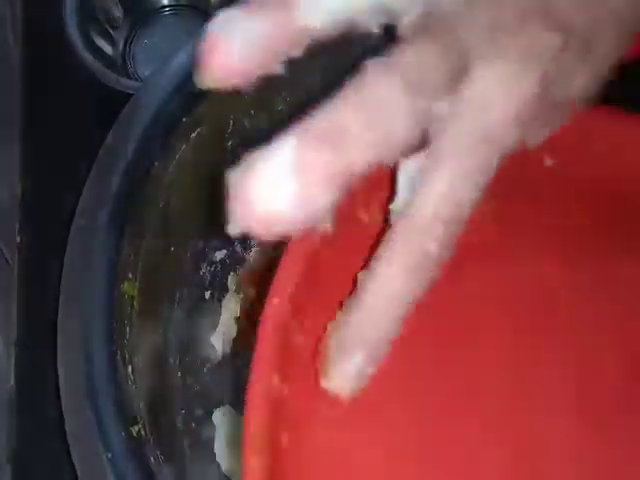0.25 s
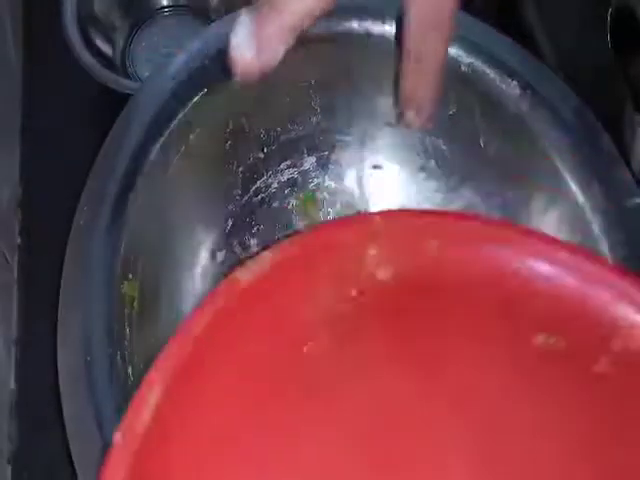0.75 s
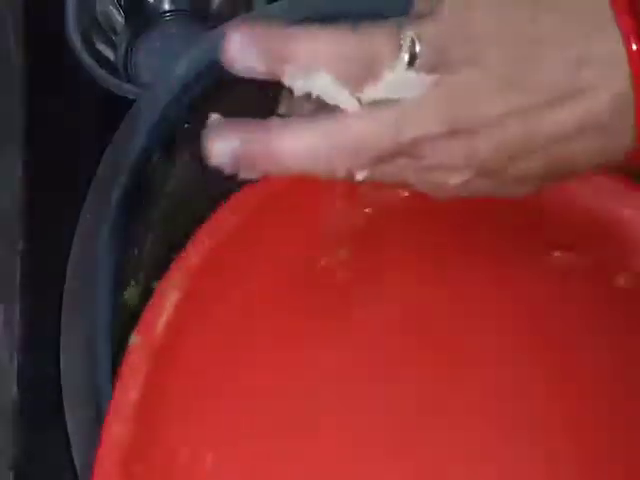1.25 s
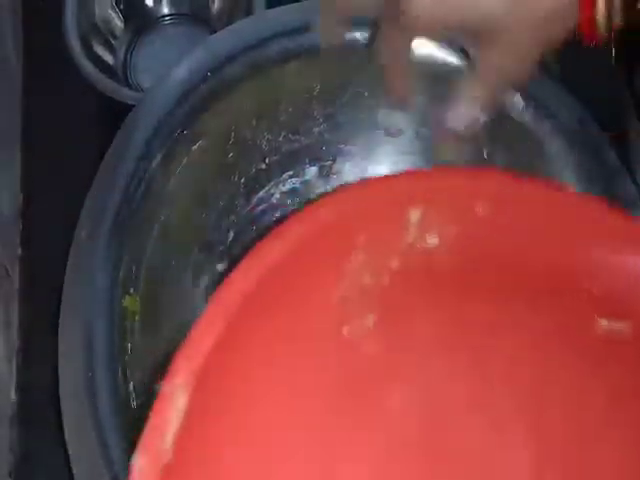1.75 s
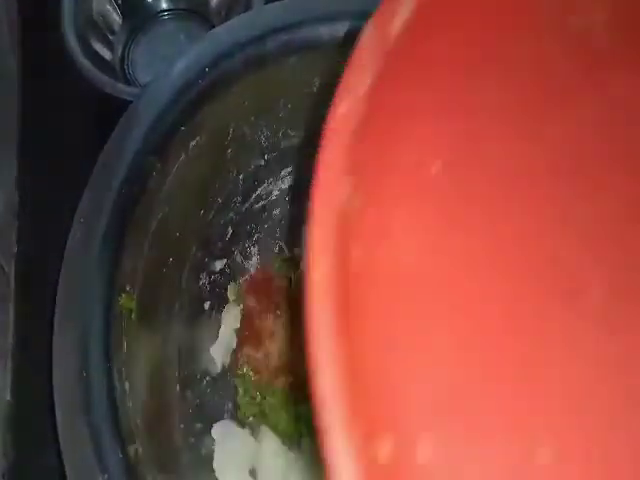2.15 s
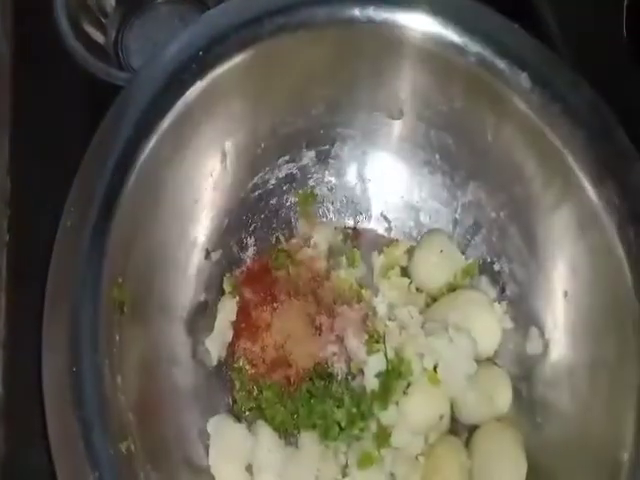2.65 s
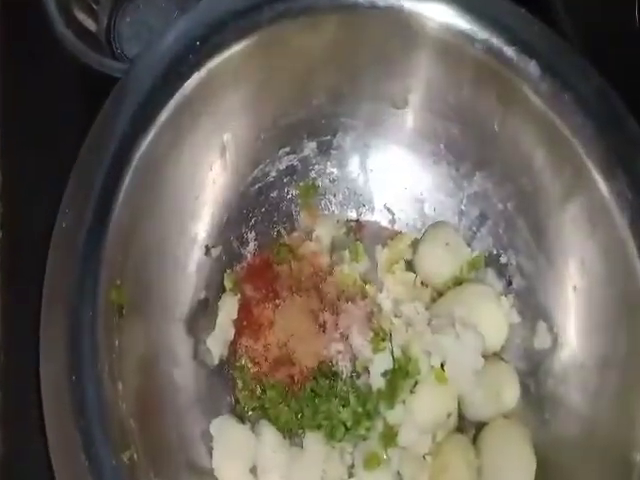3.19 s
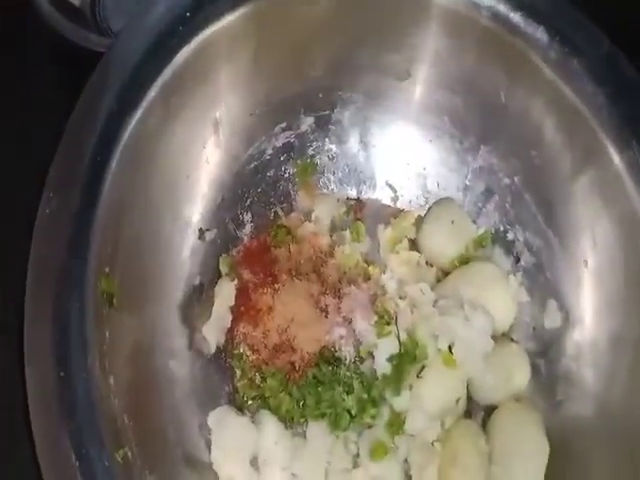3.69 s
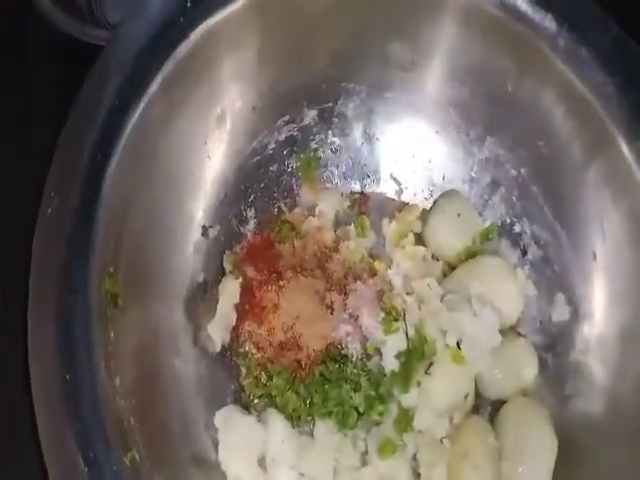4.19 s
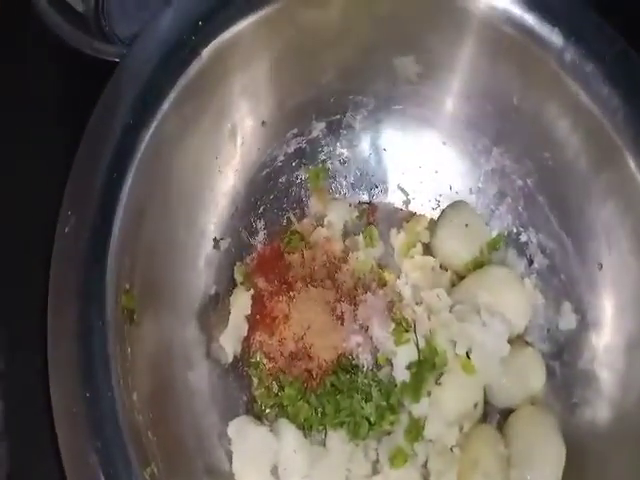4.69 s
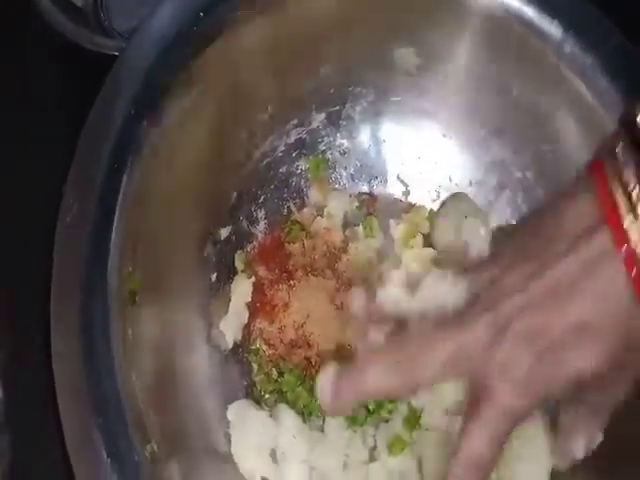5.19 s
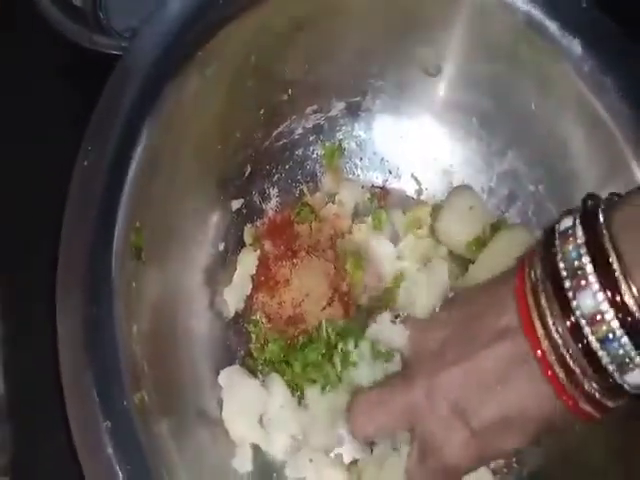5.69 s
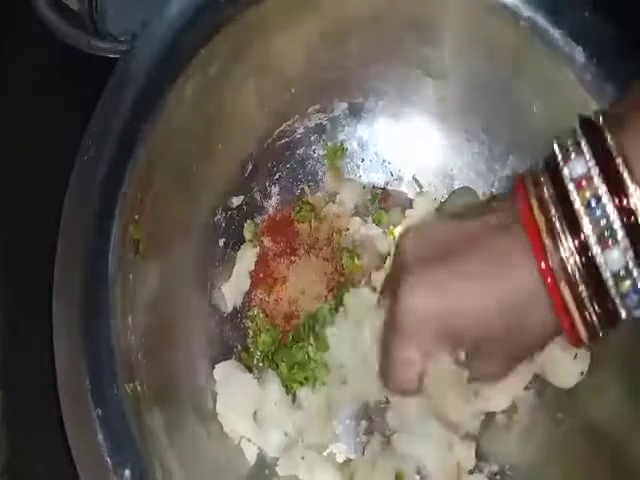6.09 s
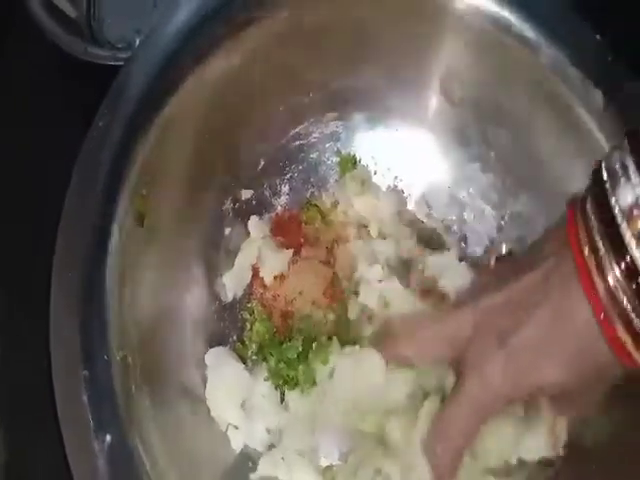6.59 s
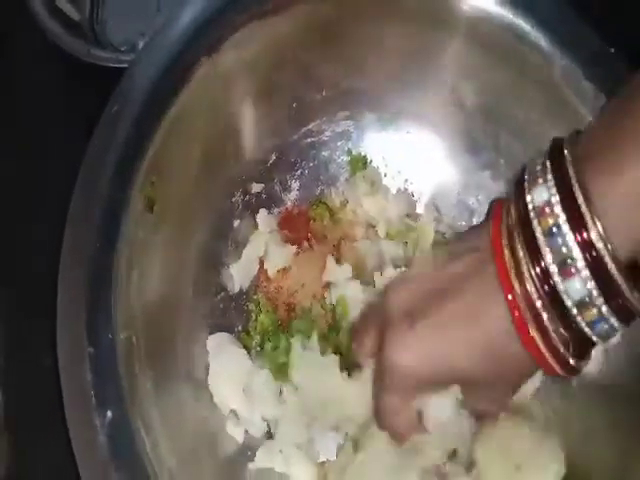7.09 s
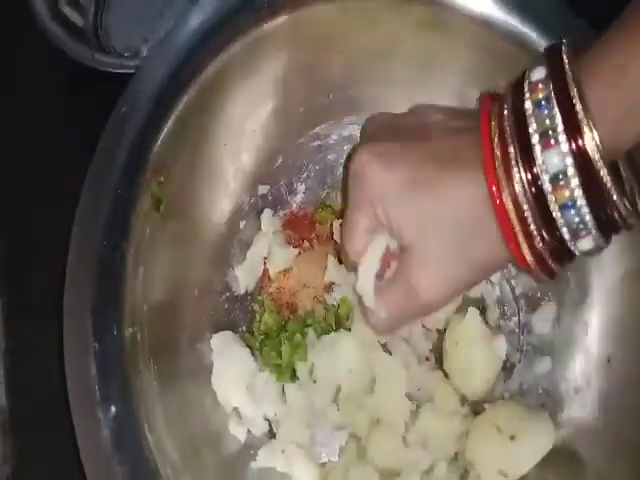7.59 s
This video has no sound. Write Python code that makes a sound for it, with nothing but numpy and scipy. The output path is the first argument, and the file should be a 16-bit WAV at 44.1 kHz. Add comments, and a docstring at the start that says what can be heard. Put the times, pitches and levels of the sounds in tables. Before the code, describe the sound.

Bangles clink lightly as a lid is set down with a clatter, then metal clashes ring from a bowl over soft, popping potato mash.

```python
"""Small kitchen, phone held just above a steel bowl: a plastic lid slides off, is put down, then a hand mashes.
The lid is grainy rubbing noise, hollow groans and knocks; wrist bangles are chattering clicks with ringing modes.
Bangles clash and scrape on the bowl and excite its modes; boiled potato is grainy noise, pops and low thuds.
A low, wavering hum, a hollow low handling rumble and a hiss lie underneath; a short dense tail gives the walls."""
import sys
import numpy as np
from scipy import signal
from scipy.fft import rfft, irfft, next_fast_len
from scipy.io import wavfile
from scipy.ndimage import uniform_filter1d

SR = 44100
rng = np.random.default_rng(int(sys.argv[2]) if len(sys.argv) > 2 else 0)


def generate_wav(sig):
    """Save sig (samples, or channels by samples) to the path in sys.argv[1] as 16-bit PCM at SR."""
    pcm = np.round(np.clip(np.atleast_2d(sig).T, -1, 1) * 32767).astype(np.int16)
    wavfile.write(sys.argv[1], SR, pcm)


N = 346183
TIME = np.arange(N) / SR


def amp(db):
    """Decibels to gain."""
    return 10 ** (np.asarray(db) / 20)


def pan(db):
    """Left and right gains for a level difference, left minus right."""
    return amp(np.array([[db], [-db]]) / 2)


def add(track, s, sound):
    """Mix a stereo sound into a track at a time."""
    start = max(int(s * SR), 0)
    track[:, start:start + sound.shape[1]] += sound[:, :N - start]


def convolve(x, response):
    """Pass a stereo sound through a stereo response."""
    return signal.fftconvolve(x, response, axes=1)[:, :N]


def walk(n, step):
    """Smooth random wander that turns about every step points, spread 1."""
    size = max(int(step), 1)
    held = np.repeat(rng.standard_normal(n // size + 2), size)
    return uniform_filter1d(held, size)[:n] * np.sqrt(3 / 2)


def noise(n, tone, bass_db=0, treble_db=0, lumps_db=0, lump_hz=170, apart_hz=850, low_cut_hz=50):
    """Coloured stereo noise of rms 1 with chance resonances; the two ports agree only on long waves."""
    size = next_fast_len(n)
    f = np.fft.rfftfreq(size, 1 / SR) + 1
    hz, db = np.transpose(tone)
    shelves = np.interp(np.log(f), np.log([800, 1800, 3000, 5500]), [bass_db, 0, 0, treble_db])
    lumps = lumps_db * np.interp(f / lump_hz, np.arange(512), rng.standard_normal(512))
    lumps = lumps * f / (f + 3 * lump_hz)  # weaker in the bass
    gain = amp(np.interp(np.log(f), np.log(hz), db) + shelves + lumps)
    gain = gain / (1 + (low_cut_hz / f) ** 2) ** 2
    mid, side = np.exp(2j * np.pi * rng.random((2, len(f)))) * gain
    side = side * np.clip(f / apart_hz, 0, 1)
    x = irfft(np.array([mid + side, mid - side]), size)[:, :n]
    return x / x.std()


def grains(n, rate, spread_db, decay_s):
    """Envelope of many tiny contacts of very unequal size, rms 1; rate is contacts per second."""
    sizes = amp(spread_db * np.minimum(rng.exponential(size=n), 4))
    pops = (rng.random(n) < rate / SR) * sizes
    power = signal.lfilter([1], [1, -np.exp(-2 / (decay_s * SR))], pops ** 2) + 1e-9
    return np.sqrt(power / power.mean())


def burst(decay_s, tone, bass_db=0, treble_db=0, lumps_db=2.0, rise=0.084):
    """A contact that builds quickly and dies away; every spot that is hit has its own colour."""
    t = np.arange(int(np.log(1000) * decay_s * SR) + 2) / SR
    hiss = noise(len(t), tone, bass_db, treble_db, lumps_db)
    return hiss * np.exp(-t / decay_s) * np.tanh(t / (rise * decay_s))


def chatter(hit, rate=260, decay_s=0.0051, spread_db=3, first=1.2, between=0.3):
    """Break a contact into a hard first touch and uneven little rebounds, keeping its energy."""
    n = hit.shape[1]
    touches = (rng.random(n) < rate / SR) * amp(spread_db * rng.standard_normal(n))
    touches[0] = first
    power = signal.lfilter([1], [1, -np.exp(-1 / (decay_s * SR))], touches ** 2)
    x = hit * np.sqrt(power + between)
    return x * hit.std() / x.std()


# bass lost per dB of hardness [dB/dB]
BASS_PER_HARDNESS = 0.55


def tilt(hard_db, bass_db=0):
    """Bass and treble (dB) of a contact: the harder, the thinner and brighter."""
    return bass_db - BASS_PER_HARDNESS * hard_db, hard_db


def favour(tone, hz, peak_db, width_octaves):
    """A spectrum with one broad resonance raised."""
    grid = np.geomspace(30, 16000, 300)
    f, db = np.transpose(tone)
    peak = peak_db * np.exp(-(np.log2(grid / hz) / width_octaves) ** 2)
    return np.transpose([grid, np.interp(np.log(grid), np.log(f), db) + peak])


def strokes(table, tone, rate, spread_db, bass_db=0, swell=.7, flutter_db=2, flutter_hz=90,
            lumps_db=12.0, travel_hz=24):
    """Stick-slip rubs that swell, flutter and fade, changing colour as the contact travels."""
    out = np.zeros((2, N))
    for s, db, hard_db, fade_s in table:
        swell_s = swell * fade_s
        t = np.arange(-min(np.pi * swell_s, s), 2 * np.pi * fade_s, 1 / SR)  # zero at the peak
        shape = np.exp(-np.where(t < 0, (t / swell_s) ** 2 / 2, t / fade_s))
        flutter = flutter_db * walk(len(t), SR / flutter_hz)
        grip = amp(db + flutter) * grains(len(t), rate, spread_db, 0.0055)
        here, there = (noise(len(t), tone, *tilt(hard_db, bass_db), lumps_db) for _ in range(2))
        place = walk(len(t), SR / travel_hz)
        add(out, s + t[0], shape * grip * (np.cos(place) * here + np.sin(place) * there))
    return out


def ring(modes, pitch=1, length_s=0.83, detune=0, blur=0, blur_hz=45):
    """Free ringing of unit energy; rattling contact blurs the upper modes, each port hears its own phase."""
    t = np.arange(int(length_s * SR)) / SR
    x = 0
    for hz, db, t60 in modes:
        phase = hz * pitch * (1 + detune * rng.standard_normal()) * t
        if blur:
            phase = phase + blur * min(hz / 2000, 1) * walk(len(t), SR / blur_hz)
        phase = phase + rng.random((2, 1)) * min(hz / 2600, 1)
        x = x + amp(db - 60 * t / t60) * np.sin(np.float32(2 * np.pi * phase))
    x = x * np.tanh(t / .0004)  # soft onset
    return x / np.sqrt(np.sum(x ** 2) / 2)


# breakpoints of hum and low handling rumble, levels before the waver: time_s [s], rumble_db, hum_db,
# upper_tone_db [dB]; used up to the start of the held levels below
LOW_LEVELS = [(0.0, -69, -59.5, -77), (0.4, -69.5, -51, -74), (1.05, -64, -69.5, -65.5),
              (1.21, -59, -61, -54), (1.55, -61.5, -49.5, -52.5), (2.32, -63.5, -64, -66),
              (2.84, -62, -52.5, -88), (3.45, -77.5, -61, -61.5), (3.9, -65, -48.5, -62),
              (4.07, -42, -42.5, -58), (4.21, -64.5, -53, -63.5), (4.5, -74, -60, -55.5),
              (5.2, -58.5, -59, -67)]
# levels the hum and rumble jump to and hold to the end: start_s [s], rumble_db, hum_db, upper_tone_db [dB]
HELD_LEVELS = (4.5, -61, -57.5, -59)
# noise spectra of hum, handling rumble and hiss: pitch_hz [Hz], level_db [dB per Hz, relative]
HUM_SPECTRUM = [(50, -53), (85, -2), (118, -0.5), (150, 1), (175, -6), (203, -14), (250, -22), (500, -77)]
RUMBLE_SPECTRUM = [(60, -52), (170, -8.5), (300, 5.5), (450, -3.5), (600, 0), (700, -30), (900, -10.5),
                   (3000, -66)]
HISS_SPECTRUM = [(100, 20.5), (500, 11.5), (1200, 2), (2500, 6.5), (4500, -6), (7000, 3), (8500, -12),
                 (15000, -19.5)]
# lower hum tone, its level over the low noise (both before the waver), upper hum tone
HUM_HZ, HUM_LINE_DB, HUM_UPPER_HZ = 131.3, -2.5, 204.6


def background(hiss_db=-65.5, waver_db=4.5, waver_hz=7, drift_cycles=0.11, hollow_db=6):
    """Wavering tones in low noise and a hollow low handling rumble swell and sink over a steady hiss."""
    def wander():
        return walk(N, SR / waver_hz)

    def hum_tone(hz):
        level = amp(waver_db * (wander() - .5))
        return level * np.sin(2 * np.pi * (hz * TIME + drift_cycles * wander()))

    # the held row comes last: np.interp keeps its levels at every time beyond its start
    s, rumble_db, hum_db, upper_db = np.transpose([*LOW_LEVELS, HELD_LEVELS])
    lower, upper = hum_tone(HUM_HZ), hum_tone(HUM_UPPER_HZ)
    hum = amp(waver_db / 2 * wander()) * noise(N, HUM_SPECTRUM) + amp(HUM_LINE_DB) * lower
    rumble = sum(amp(waver_db * wander()) * noise(N, RUMBLE_SPECTRUM, lumps_db=hollow_db, lump_hz=40.46)
                 for _ in range(3))
    out = amp(np.interp(TIME, s, hum_db)) * hum / hum.std()
    out += amp(np.interp(TIME, s, upper_db)) * upper
    out += amp(np.interp(TIME, s, rumble_db)) * rumble / rumble.std()
    return out + amp(hiss_db) * noise(N, HISS_SPECTRUM)


# hollow groans of the gripped lid: peak_s [s], level_db [dB], pitch_hz [Hz], length_s [s, fade constant]
LID_GROANS = [(0.101, -56, 348, .05), (4.06, -39, 395, .028), (1.2, -57, 346, .06),
              (1.369, -61.5, 350, .055)]


def groans():
    """The thin lid rubs slowly and answers with one hollow resonance that depends on the grip."""
    out = np.zeros((2, N))
    for s, db, hz, length_s in LID_GROANS:
        hollow = [(hz / 3, -26), (hz / 1.4, -11), (hz, 0), (hz * 1.11, -13), (hz * 3, -48)]
        out += strokes([(s, db, 0, length_s)], hollow, rate=330, spread_db=2.5, swell=.9,
                       flutter_hz=34.2, lumps_db=7)
    return out


# lid rubbing over rim and counter: peak_s [s], level_db [dB], hardness_db [dB], length_s [s, fade constant]
LID_SLIDES = [(0.172, -63, 10.5, 0.07), (0.687, -55, 10.5, 0.077), (0.758, -47, 2, 0.0035),
              (0.934, -63, 9, 0.071), (1.329, -49, -1, 0.047), (1.414, -53, -2.5, 0.025),
              (1.784, -49, 12, 0.059), (1.99, -57, 13, 0.061), (3.905, -45.5, -24, 0.041),
              (4.064, -35, -6, .036), (4.425, -59.5, 9, 0.049)]
# lid knocking on the counter: start_s [s], level_db [dB], hardness_db [dB], rattle_s [s, decay constant],
# favoured_hz [Hz, raised by the struck spot]
LID_KNOCKS = [(3.6036, -16.5, -7, .003, 2020), (3.614, -29.5, -24, .015, 930),
              (3.622, -35, -25, 0.0036, 1150), (3.879, -33.5, -4.5, .012, 1200),
              (3.959, -33, -6, 0.011, 2480), (3.993, -24.5, -2.5, 0.0085, 1690),
              (4.006, -27.5, -1, 0.0098, 2600), (4.038, -23, 2.5, .01, 2580), (4.062, -25, -1, .006, 2380)]
# spectrum of plastic contact: pitch_hz [Hz], level_db [dB per Hz, relative]
LID_SPECTRUM = [(100, -12.5), (380, 3), (560, 5.5), (850, -2), (1150, 1), (1700, -3), (2400, 3), (4200, -4),
                (7000, -5), (8600, -21.5), (15000, -57)]
# modes of the plastic lid: pitch_hz [Hz], level_db [dB, relative], t60_s [s]
LID_RESONANCES = [(391, 4.5, 0.067), (582, -8.5, 0.31), (804, 5, 0.15), (861, 5, 0.13), (966, 7, 0.058),
                  (1095, 6, 0.15), (1360, 7.5, 0.087), (2040, -6, .09)]


def lid(ring_db=-11, settle_db_per_s=13, flex_db=-8, pan_db=-1):
    """Stiff plastic: hollow knocks that ring less as it settles, a grainy dry rub, dull flexing under it."""
    knocks, ringing = np.zeros((2, 2, N))
    for s, db, hard_db, rattle_s, hz in LID_KNOCKS:
        spot = favour(LID_SPECTRUM, hz, peak_db=6.5, width_octaves=0.61)
        hit = amp(db) * chatter(burst(rattle_s, spot, *tilt(hard_db, bass_db=-3.5)))
        add(knocks, s, hit)
        add(ringing, s, amp(ring_db - settle_db_per_s * (s - LID_KNOCKS[0][0])) * hit)
    rub = strokes(LID_SLIDES, LID_SPECTRUM, rate=480, spread_db=5.0, bass_db=-12.5, swell=1.0, lumps_db=3)
    # hard rubs flex the lid less
    flexes = [(s, db + flex_db - BASS_PER_HARDNESS * max(hard_db, 0), 0, length_s)
              for s, db, hard_db, length_s in LID_SLIDES]
    dull = [(70, -15), (240, 4.0), (550, -8.5), (2500, -87)]
    flex = strokes(flexes, dull, rate=670, spread_db=5.0, swell=1.1, lumps_db=8)
    resonance = convolve(ringing, ring(LID_RESONANCES, blur=.25))
    return pan(pan_db) * (rub + flex + groans() + knocks + resonance)


# dull bumps on the bowl and the counter: start_s [s], level_db [dB], pitch_hz [Hz]
BUMPS = [(.11, -49.5, 101), (2.52, -44.5, 112), (4.045, -38, 117), (4.94, -45.5, 112),
         (5.278, -32.5, 149.6), (5.358, -36.5, 98), (5.982, -44.5, 105), (6.105, -36.5, 95.5),
         (6.791, -45, 212), (7.72, -43, 110)]


def thuds(decay_s=.052):
    """Soft, heavy contacts that give one low resonance."""
    out = np.zeros((2, N))
    for s, db, hz in BUMPS:
        add(out, s, amp(db) * burst(decay_s, [(hz / 4, -34), (hz, 0), (hz * 2, -14), (hz * 10, -60)]))
    return out


# bangle against bangle, levels before the trims in bangles(): start_s [s], level_db [dB],
# pitch_hz [Hz, main partial], ring_db [dB, ring relative to click]
BANGLE_CLINKS = [(0.186, -42, 6130, -2), (0.3144, -31.5, 6340, -9), (0.37, -40.5, 7400, -10),
                 (1.0978, -32.5, 6740, -38), (1.719, -25, 6840, -20), (1.78, -38, 6380, -6),
                 (1.897, -34, 7040, -5), (2.143, -40, 6760, -8), (2.559, -42.5, 7300, -9),
                 (3.232, -47.5, 6950, 5.5), (3.356, -43, 6600, -1.5), (4.8353, -55, 7020, 11),
                 (4.921, -56, 7150, -11), (4.9421, -37, 7320, 13), (4.9727, -28.5, 7100, -20),
                 (5.858, -39.5, 7380, -2), (6.4004, -38.5, 7100, -3.5), (7.148, -39.5, 7100, -3.5),
                 (7.7588, -34.5, 7430, -8)]
# flexing modes of one bangle before scaling: pitch_hz [Hz], level_db [dB, relative], t60_s [s]
BANGLE_MODES = [(2813, -18, .13), (4840, -15, .25), (6780, 16.5, 0.041), (7200, -2, 0.13),
                (8800, -22, 0.14), (11600, -9, 0.1), (14030, -8, 0.16)]
# stack slipping along the forearm: peak_s [s], level_db [dB], hardness_db [dB], length_s [s, fade constant]
BANGLE_SLIPS = [(4.93, -46.5, 3, 0.015), (5.04, -46.5, 1, 0.052)]
# spectrum of bangle contact: pitch_hz [Hz], level_db [dB per Hz, relative]
CLINK_SPECTRUM = [(400, -10.5), (1500, -10.5), (3000, 1.5), (4500, -4), (7000, 2), (8500, -9.5),
                  (12000, -14.5), (15000, -11.5)]
# where the wrist is: time_s [s], balance_db [dB, left minus right]
WRIST_PATH = [(0, 0), (1.1, -4.5), (1.8, -0.5), (3.4, 2.5), (4.95, 3), (5.3, -11), (5.9, -3)]
# a clink harder than REBOUND_ABOVE_DB bounces once more; click and relative ring both drop by REBOUND_DB
REBOUND_ABOVE_DB, REBOUND_S, REBOUND_DB = -38, 0.035, -8


def bangles(click_db=-6, chatter_s=.007, ring_db=20, neighbour_db=7, size_spread=0.05):
    """Each clink chatters through the stack, rings one bangle and, by its own level, a larger neighbour."""
    out = strokes(BANGLE_SLIPS, CLINK_SPECTRUM, rate=240, spread_db=4.0, swell=0.93)
    rebounds = [(s + REBOUND_S, db + REBOUND_DB, hz, own_db + REBOUND_DB)
                for s, db, hz, own_db in BANGLE_CLINKS if db > REBOUND_ABOVE_DB]
    for s, db, hz, own_db in [*BANGLE_CLINKS, *rebounds]:
        pitch = hz / BANGLE_MODES[2][0]  # the third mode is the main partial
        neighbour = ring(BANGLE_MODES, .9 * pitch, length_s=.3, detune=size_spread)
        add(out, s, amp(db + click_db) * chatter(burst(chatter_s, CLINK_SPECTRUM, lumps_db=6.0)))
        add(out, s, amp(db + ring_db + own_db) * ring(BANGLE_MODES, pitch, length_s=.3))
        add(out, s, amp(db + neighbour_db) * neighbour)
    side_db = np.interp(TIME, *np.transpose(WRIST_PATH))
    return out * amp(np.array([side_db, -side_db]) / 2)


def jingle(shaken_db=-9, settle_s=0.013, kneading_db=-46, handling_db=-48, spread_db=7.5,
           size_spread=0.05, tick_db=-17, tick_s=0.0037, pressed=0.25, count=2):
    """Clashes shake the stack; lid handling and kneading add fainter ticks, damped where bangles press."""
    shaken = [(s + rng.exponential(settle_s), db + shaken_db)
              for s, db, *_ in BOWL_CLASHES for _ in range(count)]
    knead_s = KNEADING[0][0]
    kneading = [(s, kneading_db) for s in rng.uniform(knead_s, TIME[-1], size=50)]
    handling = [(s, handling_db) for s in rng.uniform(0, knead_s, size=24)]
    muted = [(hz, db, t60 * pressed) for hz, db, t60 in BANGLE_MODES]
    out = np.zeros((2, N))
    for s, db in shaken + kneading + handling:
        size = amp(db + spread_db * rng.standard_normal())
        add(out, s, size * amp(tick_db) * burst(tick_s, STEEL_SPECTRUM, bass_db=-8, treble_db=5))
        add(out, s, size * ring(muted, length_s=.15, detune=size_spread))
    return out


# lid tapping the rim as it is lifted: start_s [s], level_db [dB]
RIM_TAPS = [(2.043, -40), (2.114, -41.5), (2.318, -48), (2.433, -47.5), (2.477, -37), (2.608, -46)]


def taps(decay_s=.0035, bass_db=7, treble_db=-7):
    """Little taps of plastic on the rim, right under the microphone."""
    out = np.zeros((2, N))
    for s, db in RIM_TAPS:
        add(out, s, amp(db) * burst(decay_s, LID_SPECTRUM, bass_db, treble_db))
    return out


# bangles sliding along the bowl: peak_s [s], level_db [dB], hardness_db [dB], length_s [s, fade constant]
BOWL_SCRAPES = [(5.22, -45, 12.5, 0.032), (5.375, -35, 22, 0.015), (5.515, -25, 9, 0.024),
                (5.56, -24.5, 11.5, 0.02), (5.72, -42, 7.5, 0.042), (6.36, -43.5, 4, .028),
                (6.615, -35, -1, 0.017)]
# bangles hitting the bowl: start_s [s], level_db [dB], hardness_db [dB], chatter_s [s, decay constant],
# favoured_hz [Hz, raised by the struck spot]
BOWL_CLASHES = [(5.2626, -18, 5, 0.0067, 6570), (5.2786, -12.5, -4.5, 0.0054, 996),
                (5.284, -16, -1.5, .016, 377), (5.2926, -18, -9, .011, 1050), (5.369, -27, 9, .006, 6050),
                (5.395, -14.5, 1, 0.0073, 5370), (5.4009, -12, 5, 0.0086, 1950),
                (5.4166, -12, 1.5, .009, 4172), (5.4244, -15.5, 0, .011, 601.3),
                (5.4314, -20, 20, .007, 3970), (5.479, -17.5, 6, .006, 6650), (5.5, -20.5, 7, .005, 4220),
                (5.513, -20, 12, 0.0063, 3460), (5.661, -29, 6, .006, 6630), (5.6689, -26.5, 7, .003, 2880),
                (6.338, -33.5, -19, .006, 590), (6.584, -31, 4, .014, 2750), (6.607, -25, 1, .008, 1840),
                (6.676, -9.5, 4, 0.0046, 5790), (6.728, -23, -3, 0.0054, 6000),
                (6.787, -13, -5, .005, 1670), (6.9555, -19, 4, .0035, 4480)]
# steel bowl in close, beating groups, damped by the potatoes, with the upper modes (from about 3.5 kHz) of the
# bangle stack ringing along: pitch_hz [Hz], level_db [dB, relative], t60_s [s]
BOWL_MODES = [(266.4, 3, 0.34), (376, 3.5, 0.21), (545.4, -1.5, 0.23), (596, -0.5, 0.24), (626, 1, 0.28),
              (710.3, 1.5, 0.088), (955, 2, 0.29), (1011, 3.5, 0.18), (1096, 2.5, 0.18), (1825, -9, 0.27),
              (1923, -0.5, .15), (2280, -4.5, 0.57), (3510, -8, .15), (3736, -6, .14), (5000, -2, 0.13),
              (5900, 7, 0.13), (6260, 3.5, .2), (6840, 4, 0.14)]
# spectrum of contact with steel: pitch_hz [Hz], level_db [dB per Hz, relative]
STEEL_SPECTRUM = [(100, -36), (260, 1.5), (450, 1), (600, 5.5), (1000, 1.5), (1300, -1), (2100, 3),
                  (2550, 1), (3150, -4.5), (3800, -0.5), (4300, -4.5), (4800, -6.5), (5300, -5.5),
                  (6400, -4), (7400, -10.5), (8400, -23), (15000, -38)]


def bowl(ring_db=-10.0, ring_per_hardness=0.22, damping_db_per_s=3.0, scrape_ring_db=-11, pan_db=-5,
         spot_db=13, spot_t60=0.03, lag_s=.0004, blur=.2):
    """Clashes and scrapes ring the steel, hard glancing clashes least; the sinking hand weakens later ones."""
    out = strokes(BOWL_SCRAPES, STEEL_SPECTRUM, rate=480, spread_db=0.5, bass_db=0.5, swell=.75, lumps_db=6.5)
    out += amp(scrape_ring_db) * convolve(out, ring(BOWL_MODES, detune=0.0034, blur=blur))
    for s, db, hard_db, chatter_s, hz in BOWL_CLASHES:
        spot = favour(STEEL_SPECTRUM, hz, peak_db=9.5, width_octaves=0.12)
        hit = burst(chatter_s, spot, *tilt(hard_db, bass_db=2.0), lumps_db=4.0)
        hit = amp(db) * chatter(hit)
        damping_db = damping_db_per_s * (s - BOWL_CLASHES[0][0])
        # the struck spot sounds briefly
        add(out, s, amp(db + spot_db - damping_db) * ring([(hz, 0, spot_t60)], length_s=2 * spot_t60))
        add(out, s, hit)
        # the pressing hand shifts the modes a little from one clash to the next
        ringing_db = ring_db - ring_per_hardness * hard_db - damping_db
        wall = ring(BOWL_MODES, length_s=.4, detune=0.0036, blur=blur)
        add(out, s, amp(ringing_db) * convolve(hit, wall))
    left = np.roll(out[0], int(lag_s * SR))  # the left port hears it later
    return pan(pan_db) * np.array([left, out[1]])


# kneading breakpoints, before the trims in mash(): time_s [s], squelch_db [dB], body_db [dB]
KNEADING = [(5.7, -51.5, -51.5), (6.56, -49.5, -51), (6.79, -45, -39.5), (7.2, -56, -64),
            (7.85, -63.5, -57)]
# fist squashing potato: peak_s [s], level_db [dB], hardness_db [dB], length_s [s, fade constant]
FIST_SQUASHES = [(6.0, -55, -20, 0.032), (6.39, -57, 3, 0.043), (7.46, -48.5, 3.5, .035),
                 (7.725, -50, -9, 0.025)]
# spectra of the tearing mash and of its soft body: pitch_hz [Hz], level_db [dB per Hz, relative]
MASH_SPECTRUM = [(500, -3.5), (1400, -14), (2400, -1), (4500, -10.5), (7000, -7.5), (8500, -24),
                 (15000, -41)]
BODY_SPECTRUM = [(30, -40), (130, -56), (280, 11), (560, 6), (900, -2), (1500, -12.5), (4000, -56)]


def mash(squelch_db=-1, body_db=-3, tear_db=-5, pan_db=-2):
    """Moist potato tears in tiny pops over a soft body, continuously and in a swell at each squash."""
    s, squelch, body = np.transpose(KNEADING)
    squelch_level = np.interp(TIME, s, squelch, left=-120) + squelch_db + 2 * walk(N, SR / 22)
    body_level = np.interp(TIME, s, body, left=-120) + body_db
    out = amp(squelch_level) * grains(N, rate=340, spread_db=1.5, decay_s=0.0052) * noise(N, MASH_SPECTRUM)
    soft = grains(N, rate=500, spread_db=-5.5, decay_s=0.011) * noise(N, BODY_SPECTRUM, bass_db=-9)
    out += amp(body_level) * soft
    out += strokes(FIST_SQUASHES, BODY_SPECTRUM, rate=200, spread_db=0.0)
    out += amp(tear_db) * strokes(FIST_SQUASHES, MASH_SPECTRUM, rate=270, spread_db=2)
    return pan(pan_db) * (out + snaps() + thuds())


# loudest air pockets in the mash: start_s [s], level_db [dB, nominal], pitch_hz [Hz, centre]
LOUD_SNAPS = [(5.876, -32.5, 2860), (5.96, -32.5, 2420), (6.004, -37, 3400), (6.194, -34.5, 3200),
              (6.422, -31.5, 3000), (7.029, -33.5, 2400), (7.1869, -31, 2830), (7.2755, -38, 4700),
              (7.4595, -33.5, 2520), (7.723, -38, 2300), (7.781, -32.5, 4350)]
# spectrum of a bursting air pocket: pitch_ratio [multiple of centre], level_db [dB per Hz, relative]
POCKET_SPECTRUM = [(.15, -27), (.7, -11), (1, -2.5), (1.3, -2.5), (2.1, -13), (3, -26.5)]


def snaps(snap_s=0.0014, ping_db=8, ping_t60=0.033, small_db=-47, spread_db=3, small_hz=2800,
          spread_octaves=0.77, count=24):
    """Air pockets burst with a snap and a tiny pitched pop: a few loud, small ones at random in the kneading."""
    knead_s = KNEADING[0][0]
    small = [(knead_s + when * (TIME[-1] - knead_s),
              small_db + spread_db * rng.standard_normal(),
              small_hz * 2 ** (spread_octaves * (2 * size - 1)))
             for when, size in rng.random((count, 2))]
    out = np.zeros((2, N))
    for s, db, hz in [*LOUD_SNAPS, *small]:
        pocket = [(hz * ratio, gain_db) for ratio, gain_db in POCKET_SPECTRUM]
        add(out, s, amp(db) * burst(snap_s, pocket))
        add(out, s, amp(db + ping_db) * ring([(hz, 0, ping_t60)], length_s=2 * ping_t60))
    return out


def kitchen(low_t60=0.4, high_t60=0.24, split_hz=2500, first_s=0.0071):
    """Hard walls close by: a dense tail whose treble dies first."""
    t = TIME[:SR]
    air = noise(SR, [(50, 0), (16000, 0)])
    low = signal.sosfilt(signal.butter(1, split_hz, fs=SR, output="sos"), air)
    tail = low * 1000 ** (-t / low_t60) + (air - low) * 1000 ** (-t / high_t60)
    tail = tail * (t > first_s)
    return tail / np.sqrt(np.sum(tail ** 2) / 2)


def scene(bangle_wet_db=-4, bowl_wet_db=-7, lid_wet_db=-1, mash_wet_db=-10):
    """The lid is furthest away and gets the most room."""
    low_bed, plastic, wrist, rim = background(), lid(), bangles() + jingle(), taps()
    steel, potato = bowl(), mash()
    send = amp(bangle_wet_db) * (wrist + rim) + amp(bowl_wet_db) * steel
    send += amp(lid_wet_db) * plastic + amp(mash_wet_db) * potato
    return low_bed + plastic + wrist + rim + steel + potato + convolve(send, kitchen())


# unequal hearing of the two microphone ports: pitch_hz [Hz], balance_db [dB, left minus right]
MICROPHONE_BALANCE = [(60, 3), (120, 0), (400, 0), (1000, 1.5), (2000, -2), (6500, -0.5), (9000, 5.5),
                      (14000, 3)]


def record(dry, low_cut_hz=45, top_hz=15700):
    """The phone colours each port, thins the deepest bass, rounds the highest peaks and cuts the top."""
    size = next_fast_len(N)
    hz, db = np.transpose(MICROPHONE_BALANCE)
    side_db = np.interp(np.log(np.fft.rfftfreq(size, 1 / SR) + 1), np.log(hz), db)
    heard = irfft(rfft(dry, size) * amp(np.array([side_db, -side_db]) / 2), size)[:, :N]
    heard = signal.sosfilt(signal.butter(1, low_cut_hz, "high", fs=SR, output="sos"), heard)
    return signal.sosfilt(signal.ellip(10, .2, 70, top_hz, fs=SR, output="sos"), np.tanh(heard))


dry = scene()
out = record(dry)
generate_wav(out)
```